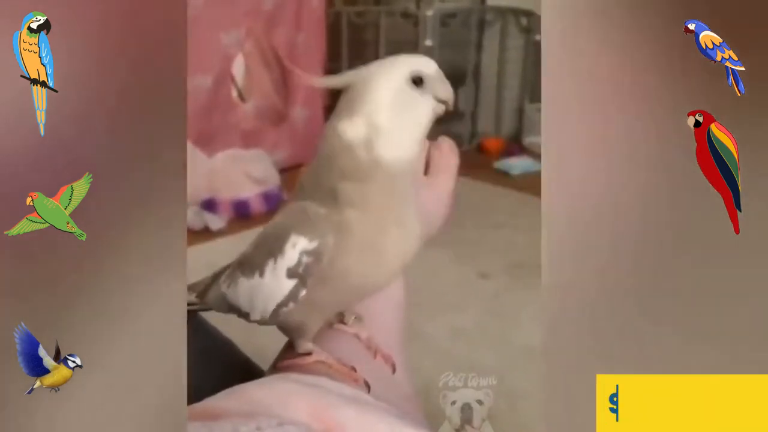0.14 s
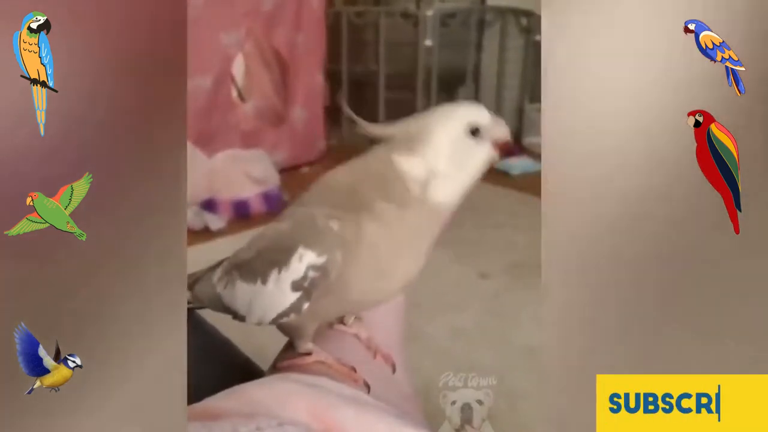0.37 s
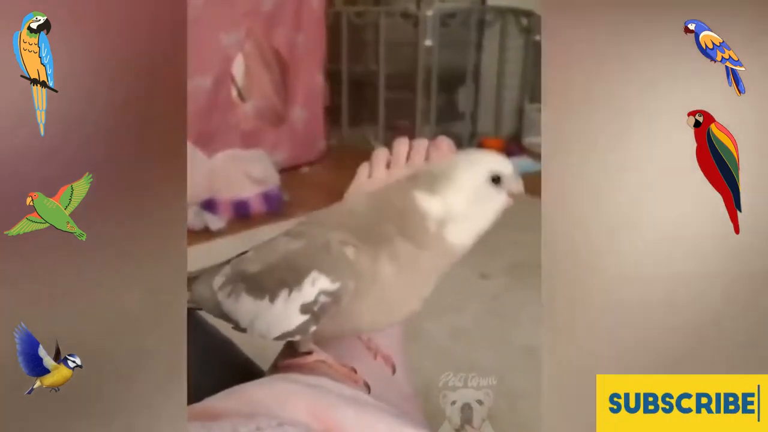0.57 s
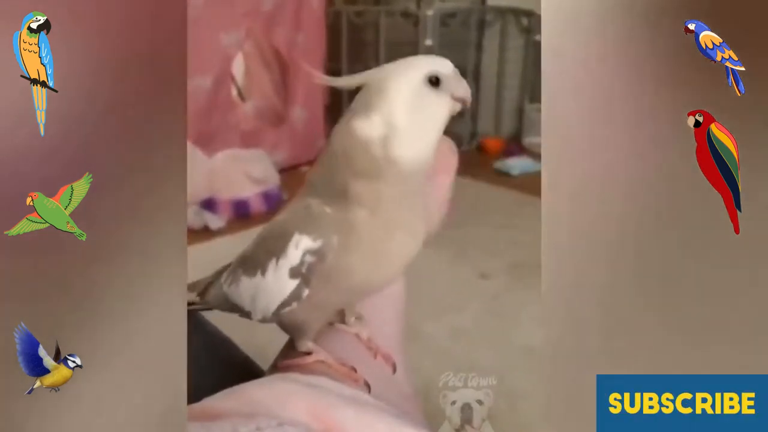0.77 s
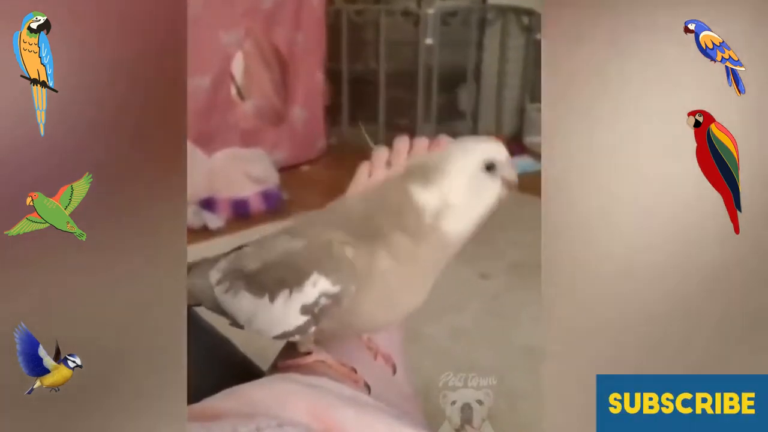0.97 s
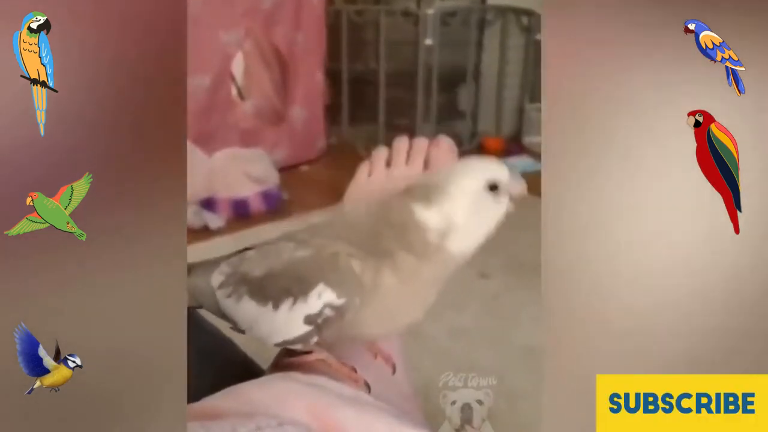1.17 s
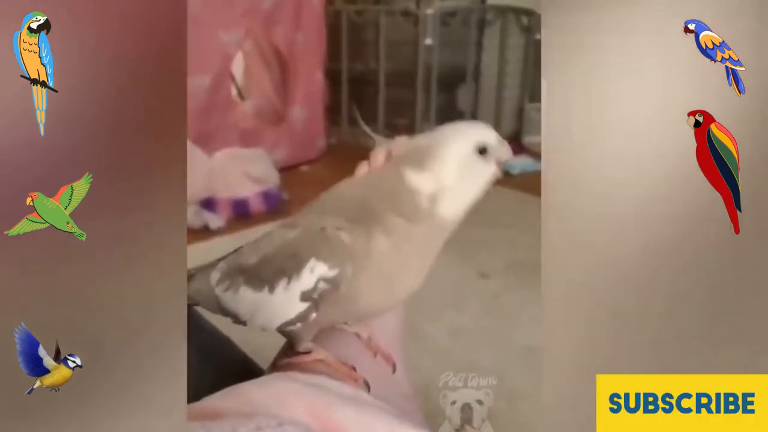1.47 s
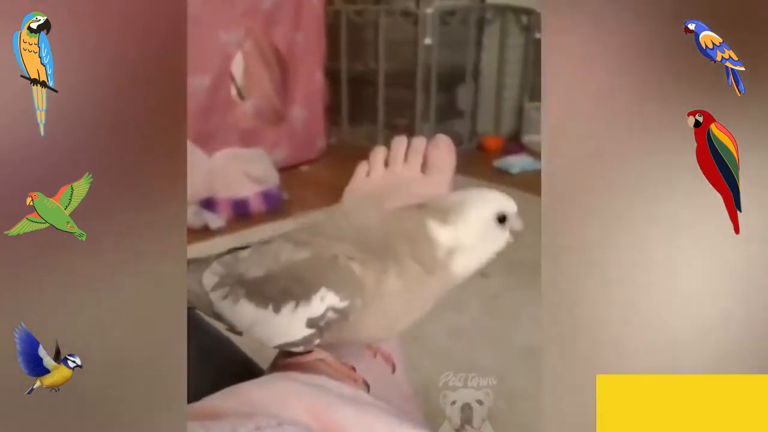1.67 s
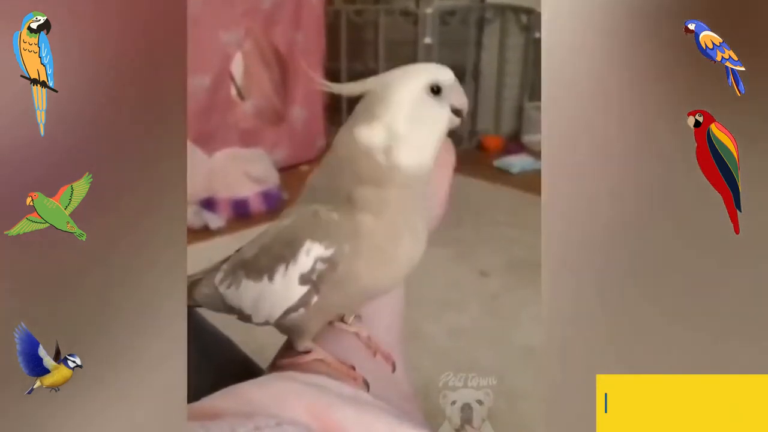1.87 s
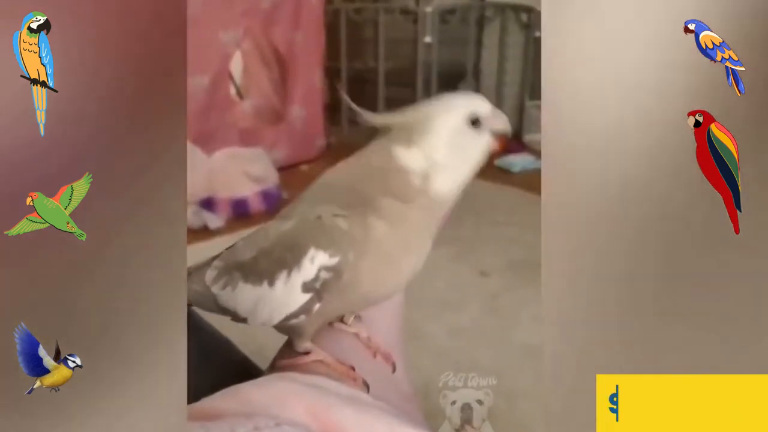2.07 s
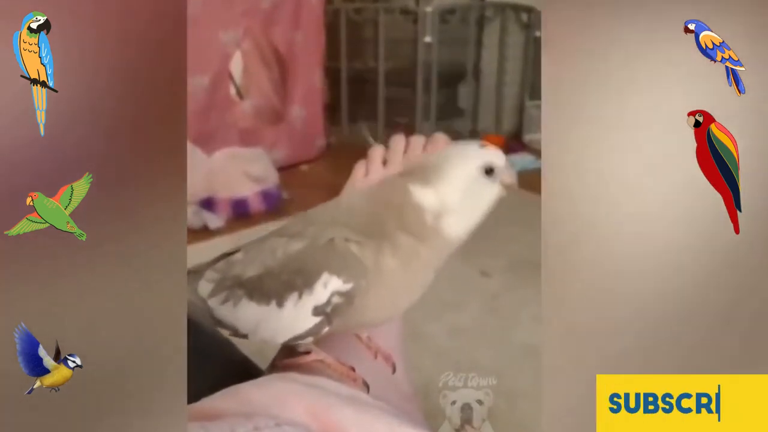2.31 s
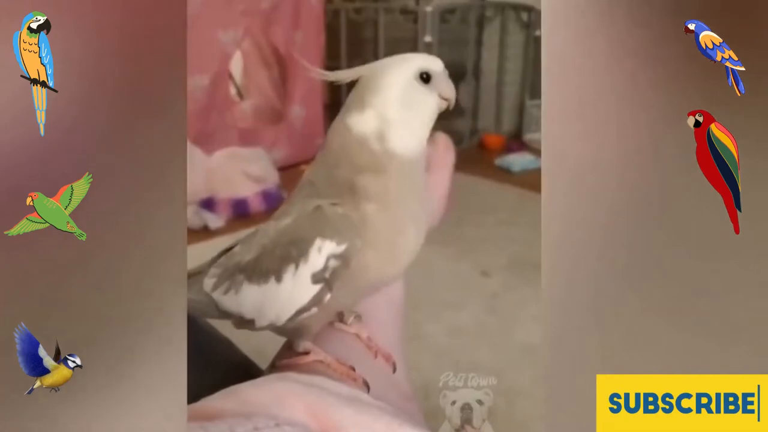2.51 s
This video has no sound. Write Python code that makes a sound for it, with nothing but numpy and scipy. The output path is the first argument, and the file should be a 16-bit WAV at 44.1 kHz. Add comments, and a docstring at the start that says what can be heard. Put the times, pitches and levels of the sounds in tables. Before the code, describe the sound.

A cockatiel warbles close to a stereo microphone in a small, lightly reverberant room. Raspy onsets clear into reedy, nasal whistles: two short chirps and a longer whistle from 0.15 to 0.8 seconds, five quick, at first louder syllables from 1.0 to 1.6, and three more from 1.9 to 2.3. Small beak ticks, a very faint rustle near 0.85 and a soft low bump at 1.6 sit over steady low hum.

```python
"""Cockatiel in a humming room

A cockatiel warbles three short phrases close to a stereo microphone in a small room with a mains hum.
Most syllables start as a rasp, noise and jittered partials, and clear into a tone of doubled period,
so half lines lie between its harmonics. Tongue and beak sweep one resonance over the upper lines.
The beak ticks in short noise bursts; a low sine bump and a faint noise rustle pass by.
"""
import sys
import numpy as np
from scipy import signal
from scipy.fft import rfft, irfft, next_fast_len
from scipy.io import wavfile
from scipy.ndimage import uniform_filter1d, minimum_filter1d

SR = 44100
rng = np.random.default_rng(int(sys.argv[2]) if len(sys.argv) > 2 else 0)


def wav_out(sig):
    """Save sig, one row per channel (or a flat mono array), as 16-bit PCM at SR to the path in sys.argv[1]."""
    wavfile.write(sys.argv[1], SR, np.round(np.clip(np.atleast_2d(sig).T, -1, 1) * 32767).astype(np.int16))


N = 116865


def amp(db):
    """Decibels to gain."""
    return 10 ** (np.asarray(db) / 20)


def evened(x):
    """Scales to rms 1."""
    return x / np.sqrt(np.mean(abs(x) ** 2) + 1e-20)


def read(points, hz):
    """Reads a table on a log-frequency axis."""
    f, value = np.transpose(points)
    return np.interp(np.log(hz + 1), np.log(f + 1), value)


def add(mix, s, sound):
    """Adds a sound at time s, cut off at the end of the mix."""
    part = mix[max(round(s * SR), 0):][:len(sound)]
    part += sound[:len(part)]


def coloured(x, points):
    """Filters by a table of (freq_hz, gain_db)."""
    size = x.shape[-1]
    gain = amp(read(points, np.fft.rfftfreq(size, 1 / SR)))
    return irfft(rfft(x) * gain, size)


def resonate(x, hz, width_hz):
    """A resonance of gain 1 that follows the curve hz: shift down to 0 Hz, smooth, shift back."""
    turn = np.exp(2j * np.pi * np.cumsum(hz) / SR)
    r = np.exp(-np.pi * width_hz / SR)
    return 2 * (turn * signal.lfilter([1 - r], [1, -r], x / turn)).real


def flutter(size, hz):
    """Complex random wobble of rms 1, rolling off above a rate of hz."""
    count = next_fast_len(size + 2048)
    a, b = rng.standard_normal((2, count))
    rolloff = 1 + (np.fft.fftfreq(count, 1 / SR) / hz) ** 4
    return evened(np.fft.ifft((a + 1j * b) / rolloff)[:size])


# Spectral tilt of the room rumble, before its level is set: freq_hz, gain_db
RUMBLE_COLOUR = [(20, -5.5), (50, 1), (125, -3), (180, -11.5), (250, -10.5), (320, -15), (480, -9),
                 (800, -20), (4500, -39), (13000, -45)]
RUMBLE_DB = -46  # rms
RUMBLE_LIKENESS = 0.8  # share of the power common to left and right


def rumble():
    """Room rumble: shaped noise, partly shared by the two channels."""
    shared, *own = rng.standard_normal((3, N))
    noise = np.sqrt(RUMBLE_LIKENESS) * shared + np.sqrt(1 - RUMBLE_LIKENESS) * np.array(own)
    return amp(RUMBLE_DB) * evened(coloured(noise, RUMBLE_COLOUR))


# Lines of the mains hum: freq_hz, level_db (rms)
HUM_LINES = [(120, -49), (240, -60.5)]
HUM_WAVER = 0.18  # rms of the complex wobble against a steady line


def mains_hum():
    """Mains hum: steady lines, each wavering slowly in strength and phase."""
    t = np.arange(N) / SR
    hum = np.zeros(N)
    for hz, db in HUM_LINES:
        waver = 1 + HUM_WAVER * flutter(N, hz=7)
        hum += amp(db) * evened((waver * np.exp(2j * np.pi * hz * t)).real)
    return hum


# Half-line strength, sinking where the voice turns to a plain whistle: time_s, half_line_db
DOUBLING = [(.545, 0.5), (.57, 5), (.675, 3), (.69, -16), (.73, -16), (.745, 11.5), (.78, -3.5), (1, 0.5)]
HALF_LINE_DB, HALF_LINE_ROUGH_DB = -19.5, 7.5  # the line an octave under the tone, and its rise in a rasp
TONE_ROUGH = 0.52  # share of the roughness that reaches the tone
FLUTTER_HZ = 241  # rate of the wobble in a rough partial
JITTER, JITTER_HZ = 0.023, 200  # pitch jitter at full roughness (rms fraction), and its rate
ATTACK_S, RELEASE_S = 0.003, 0.0072
LEAD_S, TRAIL_S = 0.001, 0.004  # extra time before and after the syllable's points


def line(phase, rough):
    """One partial, from a clean sine (rough 0) to a chaotic rasp (rough 1)."""
    rough = np.clip(rough, 0, 1)
    wobble = np.sqrt(1 - rough ** 2) + rough * flutter(len(phase), FLUTTER_HZ)
    return np.sqrt(2) * (wobble * np.exp(1j * phase)).real


def syllable(points, facing_db):
    """A period-doubled tone, its half line, beak-swept upper lines, rasp and faint overtones."""
    times, *columns = np.transpose(points)
    t = np.arange(times[0] - LEAD_S, times[-1] + TRAIL_S, 1 / SR)
    tone_hz, tone_db, upper_db, beak_hz, rough = (np.interp(t, times, c) for c in columns)
    left_s = t[-1] - t
    # roughness fades away at the end, ahead of the tone
    rough = np.clip(rough, 0, 1) * np.minimum(left_s / (2 * RELEASE_S), 1)
    doubling_db = np.interp(t, *np.transpose(DOUBLING))

    half_hz = tone_hz / 2
    jitter = 1 + JITTER * rough * flutter(len(t), JITTER_HZ).real
    phase = 2 * np.pi * np.cumsum(half_hz * jitter) / SR
    half_db = (tone_db + upper_db) / 2 + doubling_db + HALF_LINE_DB + HALF_LINE_ROUGH_DB * rough
    tone = amp(tone_db) * line(2 * phase, TONE_ROUGH * rough)
    half_line = amp(half_db) * line(phase, rough)

    rasp_share = RASP_SHARE * rough ** 3
    lines = upper_lines(phase, half_hz, beak_hz, rough, doubling_db)
    upper = np.sqrt(1 - rasp_share) * lines + np.sqrt(rasp_share) * rasp(beak_hz)
    treble = overtones(phase, half_hz, upper_db + facing_db, rough, doubling_db)
    voice = tone + half_line + amp(upper_db) * upper + treble
    gate = np.minimum((t - t[0]) / ATTACK_S, 1) * np.minimum(left_s / RELEASE_S, 1)
    return t[0], voice * np.sin(np.pi / 2 * gate) ** 2


# Fixed colour of the throat, ahead of the beak resonance: freq_hz, gain_db
THROAT = [(1750, 0), (2050, 2), (2400, 0), (3000, 4), (3330, -7), (3450, -1), (3900, 0.5)]
BEAK_WIDTH_HZ, BEAK_LEAK = 337, 0.04  # half-width of the resonance; what passes far from it
SHIMMER_DB, SHIMMER_HZ = 1.5, 30  # each upper line drifts in strength (rms), and how fast


def upper_lines(phase, half_hz, beak_hz, rough, doubling_db):
    """Lines 3 to 6 of the half pitch, weighted by throat and moving beak, at constant total power."""
    numbers = range(3, 7)
    weights = []
    for k in numbers:
        throat = amp(read(THROAT, k * half_hz) + k % 2 * doubling_db)  # odd numbers are half lines
        beak = BEAK_LEAK + 1 / (1 + ((k * half_hz - beak_hz) / BEAK_WIDTH_HZ) ** 2)
        weights.append(throat * beak)
    weights = np.array(weights) / np.linalg.norm(weights, axis=0)
    out = np.zeros(len(phase))
    for k, weight in zip(numbers, weights):
        shimmer = amp(SHIMMER_DB * flutter(len(phase), SHIMMER_HZ).real)
        out += weight * shimmer * line(k * phase, rough)
    return out


# Colour of the rasp and the rustle noise, before levelling: freq_hz, gain_db
RASP_COLOUR = [(300, -30), (700, -4), (1800, 8), (2400, -2), (3200, 4), (4000, 1), (4600, -25.5),
               (13000, -38.5)]
RASP_SHARE, RASP_WIDTH_HZ = 0.95, 880  # share of upper-line power at full roughness; width of each resonance
SPUTTER_DB, SPUTTER_HZ = 4, 170  # uneven spurts: rms depth and rate


def rasp(beak_hz):
    """Sputtering noise that passes the beak resonance twice."""
    noise = rng.standard_normal(len(beak_hz))
    for _ in range(2):
        noise = resonate(noise, beak_hz, RASP_WIDTH_HZ)
    noise *= amp(SPUTTER_DB * flutter(len(noise), SPUTTER_HZ).real)
    return evened(coloured(noise, RASP_COLOUR))


# Faint overtones against the upper lines, before the offsets below: freq_hz, level_db
OVERTONES = [(4500, -52), (5500, -41), (7000, -52.5), (8500, -43.5), (9900, -63), (11200, -35.5),
             (12300, -39), (13200, -53.5)]
OVERTONE_ROUGH = 0.17  # added roughness
ODD_OVERTONE_DB, OVERTONE_RASP_DB = -2.5, -9.5  # offset of the half lines; change at full roughness


def overtones(phase, half_hz, treble_db, rough, doubling_db):
    """Lines 7 to 21 of the half pitch: a faint, slightly rough treble that thins in the rasp."""
    out = np.zeros(len(phase))
    for k in range(7, 22):
        level_db = treble_db + read(OVERTONES, k * half_hz) + OVERTONE_RASP_DB * rough
        level_db = level_db + k % 2 * (ODD_OVERTONE_DB + doubling_db)
        out += amp(level_db) * line(k * phase, rough + OVERTONE_ROUGH)
    return out


# Beak ticks: start_s, level_db (rms before the decay)
TICKS = [(.154, -36), (.309, -31.5), (0.448, -34), (.998, -31), (1.273, -33), (1.548, -32)]
# Colour of a tick, before levelling: freq_hz, gain_db
TICK_COLOUR = [(800, -16), (2500, 11.5), (3800, 4), (5000, -3), (7000, -22.5), (13000, -29)]
TICK_DECAY_S = 0.0026


def beak_ticks():
    """Short dry ticks: coloured noise bursts that die away exponentially."""
    out, t = np.zeros(N), np.arange(1024) / SR
    for s, db in TICKS:
        burst = evened(coloured(rng.standard_normal(len(t)), TICK_COLOUR))
        add(out, s, amp(db) * burst * np.exp(-t / TICK_DECAY_S))
    return out


RUSTLE_S, RUSTLE_LENGTH_S = 0.855, 0.025  # centre of the swell, and its reach to either side
RUSTLE_DB, RUSTLE_HZ = -54, 3600


def rustle():
    """A faint, brief swell of bright resonant noise after the long whistle."""
    swell = np.exp(-((np.arange(N) / SR - RUSTLE_S) / RUSTLE_LENGTH_S) ** 2)
    noise = coloured(rng.standard_normal(N), RASP_COLOUR)
    noise = resonate(noise, np.full(N, RUSTLE_HZ), RASP_WIDTH_HZ)
    return amp(RUSTLE_DB) * swell * evened(noise)


THUMP_S, THUMP_DB, THUMP_HZ, THUMP_DECAY_S = 1.625, -32.5, 52, 0.015  # level is the envelope's peak


def handling_bump():
    """A soft bump of handling: a low sine that swells quickly and dies away."""
    age = np.maximum(np.arange(N) / SR - THUMP_S, 0)
    envelope = age / THUMP_DECAY_S * np.exp(1 - age / THUMP_DECAY_S)
    return amp(THUMP_DB) * envelope * np.sin(2 * np.pi * THUMP_HZ * age)


# Level balance of the two microphone ports: freq_hz, left_minus_right_db
PORT_BALANCE = [(650, 2.5), (1300, 0), (1950, -2.5), (2650, 0.5), (3300, -3), (4000, -2), (8000, 9),
                (12000, 14)]
# Phase by which the left port leads: freq_hz, lead_rad
PORT_PHASE = [(0, 0), (1300, 1.15), (1950, 2.7), (2650, 4.1), (3300, 5.4), (4000, 7), (13000, 20.5)]


def ports(x, pan_db, lead_s):
    """Direct sound at the two ports, split by level and phase; pan and lead add to the tables."""
    hz = np.fft.rfftfreq(N, 1 / SR)
    side = np.array([[0.5], [-0.5]])  # left, right
    phase = np.interp(hz, *np.transpose(PORT_PHASE)) + 2 * np.pi * hz * lead_s
    gain = amp(side * (read(PORT_BALANCE, hz) + pan_db))
    return irfft(rfft(x) * gain * np.exp(1j * side * phase), N)


# Reverberation time of the room: freq_hz, t60_s
ROOM_T60 = [(1300, 0.41), (2000, 0.38), (2650, 0.43), (4000, 0.33), (12000, 0.38)]
# Colour and level of the tail: freq_hz, gain_db
ROOM_COLOUR = [(600, -18.5), (1300, -14.5), (2000, -17), (2650, -12), (3100, -18), (8000, -9), (12000, -5)]
ROOM_DELAY_S = 0.0084  # time the tail takes to build up
ECHO_DB, ECHO_SPAN_S = -18, 0.008


def room(x):
    """A few near reflections and a short diffuse tail of decaying noise, different on each side."""
    hz, t, z = signal.stft(rng.standard_normal((2, SR // 2)), SR, nperseg=256)
    decay = amp(-60 * t / read(ROOM_T60, hz)[:, None])
    tail = signal.istft(z * decay, SR, nperseg=256)[1]
    tail *= np.minimum(np.arange(tail.shape[1]) / SR / ROOM_DELAY_S, 1) ** 2
    tail = coloured(tail / np.linalg.norm(tail[0]), ROOM_COLOUR)
    for side in tail:
        for when, sign in rng.random(size=(4, 2)):
            add(side, ECHO_SPAN_S * (0.1001 + when), amp(ECHO_DB) * np.sign([sign - 0.5]))
    return signal.fftconvolve(x[None], tail, axes=1)[:, :N]


# One list of points per syllable, roughness held to 0-1:
# time_s, tone_hz, tone_db, upper_lines_db, beak_resonance_hz, roughness
SYLLABLES = [
    [(0.153, 1275, -30, -19.5, 2870, 1.1), (0.161, 1299, -26.5, -27, 3650, 0.4),
     (0.18, 1332, -28.5, -30.5, 3080, 0.41), (0.19, 1357, -31, -19.5, 2570, 1),
     (0.196, 1329, -19, -18, 2520, 0.43), (0.21, 1347, -27, -19, 2480, 0.1),
     (0.237, 1250, -22, -24.5, 1740, 0.2), (0.243, 1296, -20, -33, 2120, 0.2)],
    [(0.291, 1416, -21, -26.5, 1810, 1.2), (0.303, 1340, -34, -35, 1850, 1.1),
     (0.312, 1353, -23, -16, 2020, 0.8), (0.322, 1297, -25, -23, 2210, 0.2),
     (0.338, 1328, -24, -22, 2470, 0.1), (0.38, 1323, -23.5, -20.5, 2360, 0.07),
     (0.394, 1296, -31.5, -33.5, 2690, 0.4)],
    [(0.446, 1353, -24.5, -32, 3030, 0.76), (0.456, 1300, -27, -31.5, 3150, 1.2),
     (0.47, 1350, -23, -21.5, 2300, 0.22), (0.49, 1339, -20.5, -21, 2360, 0.56),
     (0.502, 1307, -17.5, -14, 1890, 0.1), (0.516, 1195, -22.5, -16, 1640, 0.04),
     (0.553, 1219, -23.5, -32, 1975, 0.72), (0.607, 1189, -23.5, -35.5, 2430, 0.2),
     (0.623, 1163, -24.5, -30, 1585, 0.35), (0.665, 1172, -24.5, -31.5, 1660, 0.52),
     (0.691, 1203, -24, -32.5, 2430, 0.07), (0.743, 1190, -20, -32, 2600, 0.05),
     (0.762, 1215, -17.5, -25, 1750, 0.15), (0.782, 1354, -18, -32, 2900, 0.25)],
    [(0.997, 1257, -24, -27, 3600, 0.7), (1.012, 1330, -25, -30, 3800, 0.7),
     (1.021, 1380, -23, -22.5, 1900, 0.75), (1.033, 1340, -23, -19, 3200, 0.75),
     (1.044, 1382, -19, -15.5, 2450, 0.25), (1.062, 1379, -15, -13.5, 2450, 0.05),
     (1.083, 1356, -12.5, -15, 2240, 0.2), (1.089, 1420, -11, -28, 2370, 0.2)],
    [(1.135, 1330, -20, -25, 1720, 0.75), (1.147, 1283, -23, -21, 1774, 0.8),
     (1.156, 1300, -21, -17.5, 1900, 0.3), (1.162, 1365, -18, -21, 2750, 0.2),
     (1.177, 1360, -19, -17.5, 2700, 0.08), (1.184, 1292, -24, -13.5, 2495, 0.17),
     (1.211, 1290, -28, -20, 2700, 0.06), (1.223, 1318, -31, -25, 2900, 0.7)],
    [(1.274, 1308, -27, -26.5, 3060, 0.9), (1.288, 1311, -24, -28, 3490, 0.6),
     (1.307, 1388, -20.5, -26.5, 2610, 0.1), (1.324, 1365, -19.5, -12.5, 2700, 0.24),
     (1.348, 1338, -20, -20, 2430, 0.11), (1.361, 1257, -25.5, -24, 2010, 0.6),
     (1.369, 1223, -25.5, -21, 2060, 0.3)],
    [(1.413, 1424, -22, -32, 2160, 0.9), (1.432, 1259, -22.5, -20, 1790, 0.4),
     (1.446, 1273, -21, -25.5, 2470, 0), (1.467, 1313, -26.5, -19.5, 2600, 0.1),
     (1.482, 1339, -25.5, -25.5, 2290, 0.06), (1.49, 1320, -38.5, -30, 2730, 0.4)],
    [(1.548, 1302, -29, -27, 3300, 0.7), (1.566, 1365, -28, -26.5, 3560, 0.9),
     (1.579, 1378, -22, -23, 2300, 0.45), (1.597, 1325, -27, -19.5, 2380, 0.3),
     (1.608, 1285, -24, -19.5, 2200, 0.6), (1.617, 1250, -22, -25, 1900, 0.4)],
    [(1.9, 1267, -29.5, -20.5, 2950, 0.64), (1.917, 1346, -28, -26, 3100, 0.85),
     (1.93, 1337, -26, -27, 2300, 0.9), (1.939, 1337, -24, -17, 2515, 0.15),
     (1.962, 1334, -20, -21, 2374, 0.1), (1.981, 1258, -25, -21.5, 1700, 0.3),
     (1.989, 1240, -23.5, -29.5, 2100, 0.4)],
    [(2.038, 1302, -26, -32, 1600, 1), (2.053, 1267, -25, -20.5, 1830, 0.6),
     (2.067, 1284, -23.5, -29, 2300, 0.2), (2.089, 1332, -25, -22.5, 2353, 0.08),
     (2.133, 1325, -24.5, -27, 2030, 0.05), (2.141, 1315, -46, -23, 2310, 0.42)],
    [(2.192, 1311, -28, -24.5, 3100, 0.9), (2.202, 1347, -28.5, -27, 3140, 0.9),
     (2.209, 1290, -24, -21, 3230, 0.55), (2.217, 1292, -26.5, -21.5, 2130, 0.32),
     (2.234, 1293, -24.5, -19.5, 2540, 0.1), (2.261, 1217, -24, -21.5, 1630, 0.06),
     (2.269, 1220, -29, -51, 2100, 0.4)],
]
# Head bobs, one row per syllable: left_minus_right_db, extra_left_lead_s, overtones_db
HEAD_BOBS = [(0, 6e-5, -1), (0, 2e-5, -1.5), (-2.5, -1e-5, -8.5), (-5, -7e-5, -1.5), (-2.5, -1e-5, -2),
             (-2.5, 1.5e-5, -3), (-1, 0, -4), (-2, -7e-5, -4), (0, 5e-5, -0.5), (0, 1e-5, -4),
             (-.5, -4e-5, -4)]


def scene():
    """The bird, its room and the background; each syllable has its own head position."""
    bird = beak_ticks() + rustle()
    direct = ports(bird, 0, 0)
    for points, (pan_db, lead_s, facing_db) in zip(SYLLABLES, HEAD_BOBS):
        voice = np.zeros(N)
        add(voice, *syllable(points, facing_db))
        bird += voice
        direct += ports(voice, pan_db, lead_s)
    return direct + room(bird) + rumble() + mains_hum() + handling_bump()


CEILING = 0.85  # full scale is 1
EDGE_HZ = 13400


def record(dry):
    """A quick limiter holds the loudest peaks; then the recorder's band limit."""
    gain = np.minimum(1, CEILING / (abs(dry).max(0) + 1e-9))
    gain = uniform_filter1d(minimum_filter1d(gain, size=200), size=200)
    lowpass = signal.firwin(511, EDGE_HZ, window=("kaiser", 9), fs=SR)
    return signal.oaconvolve(dry * gain, lowpass[None], "same")


dry = scene()
out = record(dry)
wav_out(out)
```